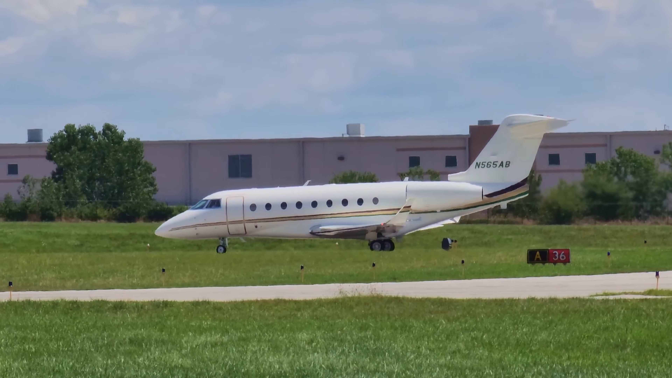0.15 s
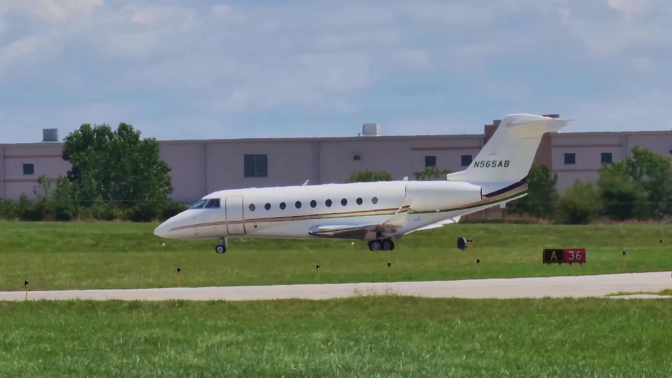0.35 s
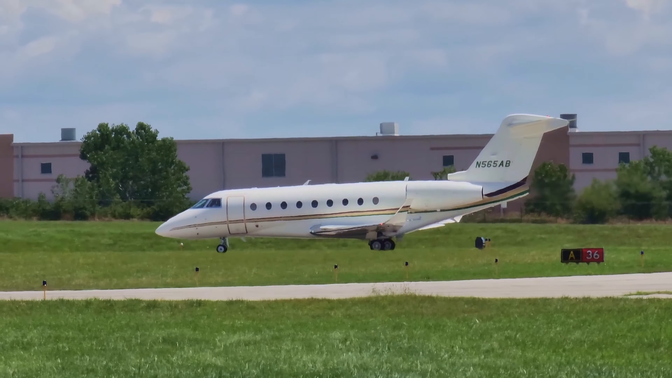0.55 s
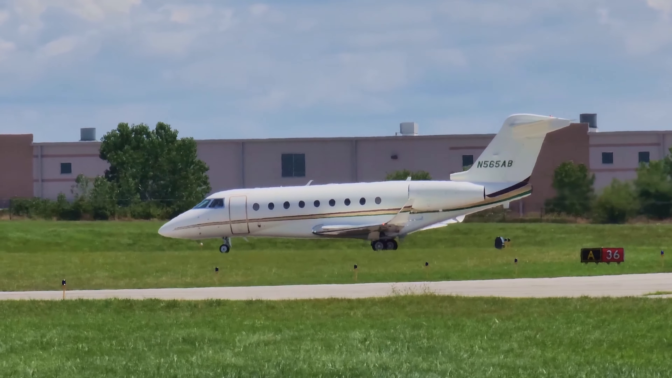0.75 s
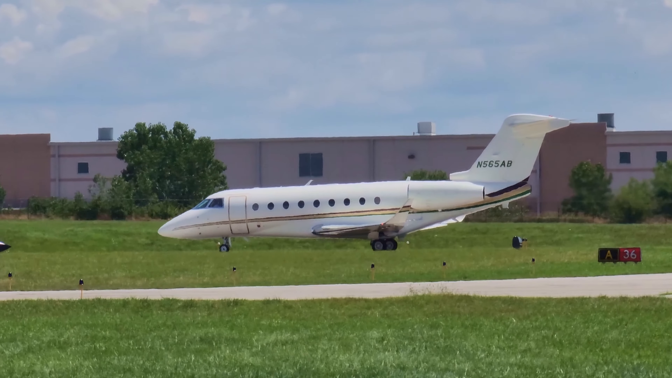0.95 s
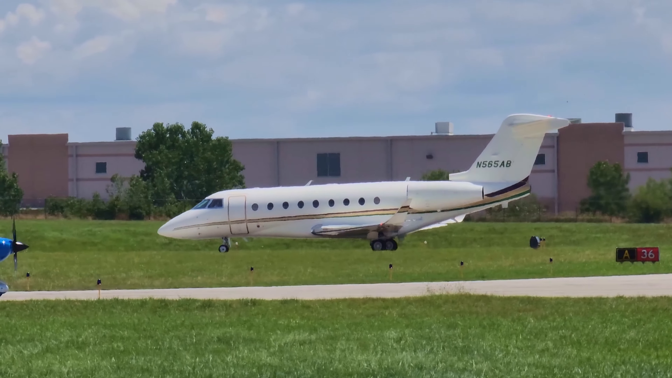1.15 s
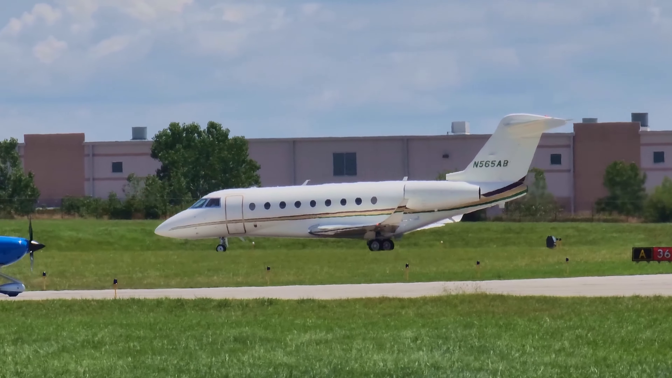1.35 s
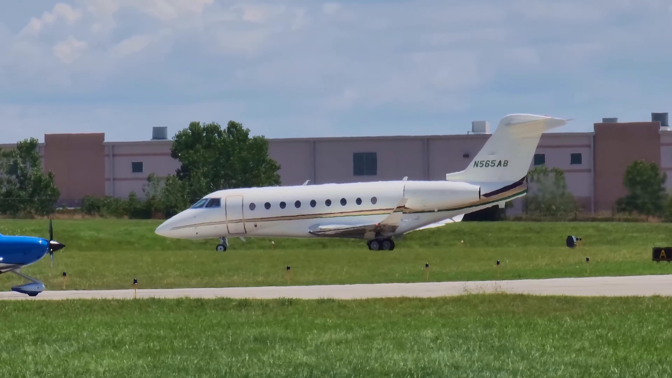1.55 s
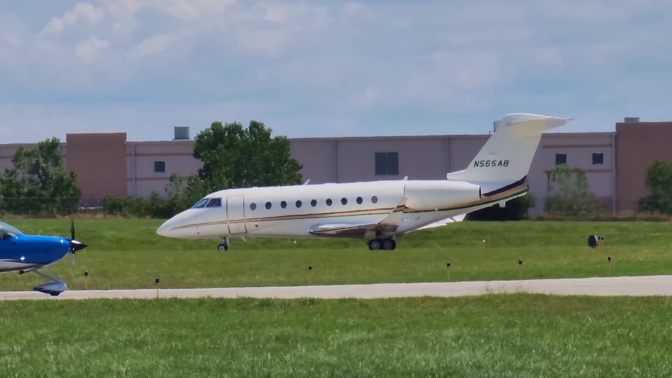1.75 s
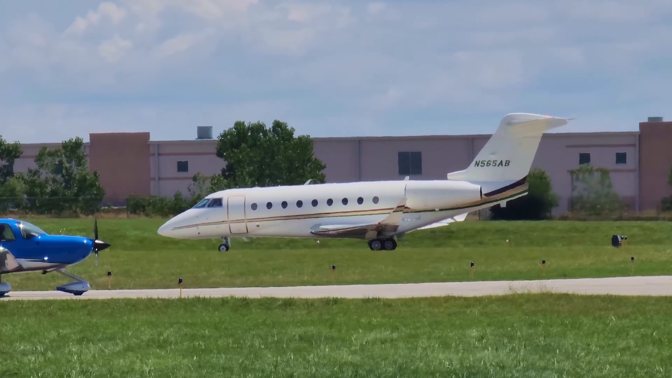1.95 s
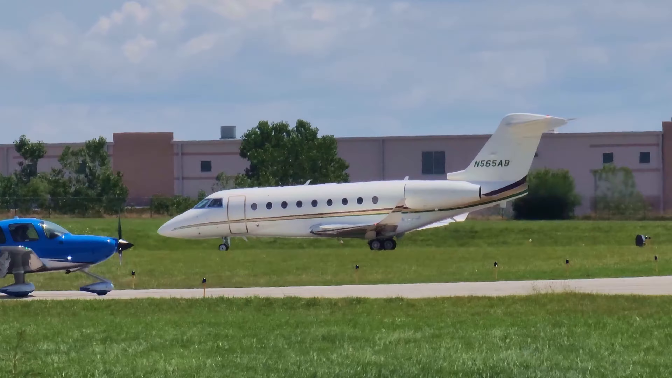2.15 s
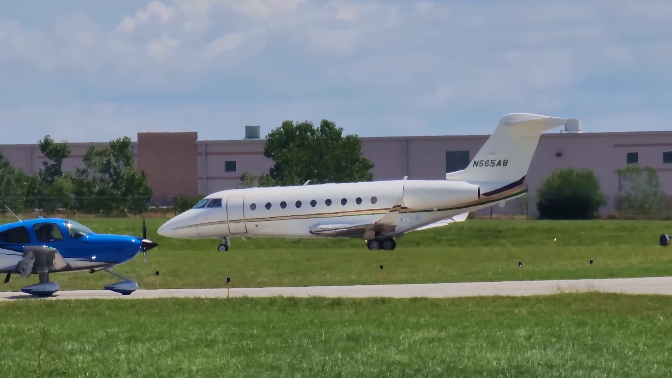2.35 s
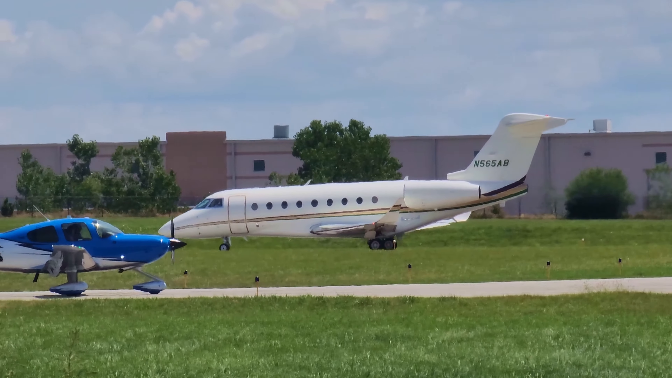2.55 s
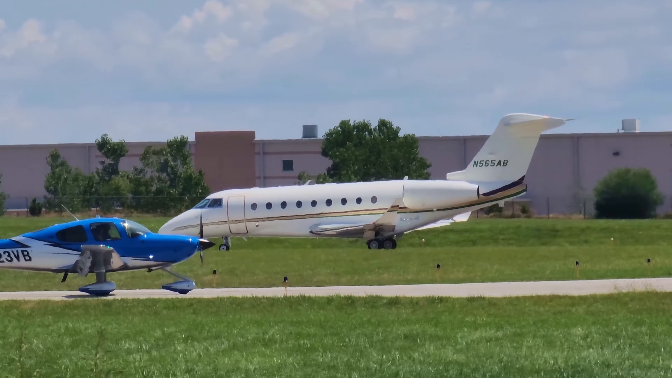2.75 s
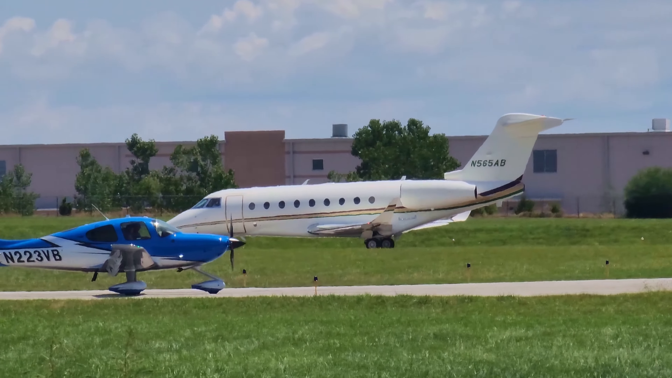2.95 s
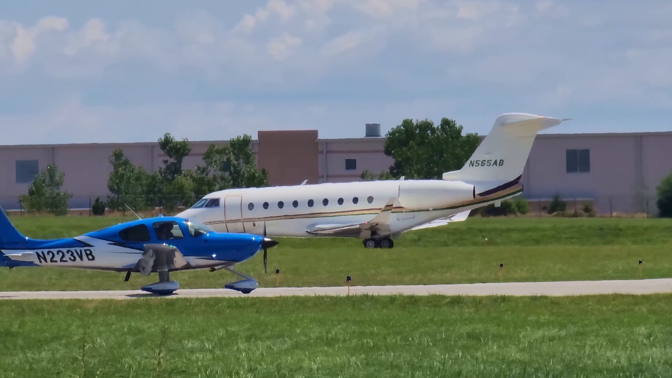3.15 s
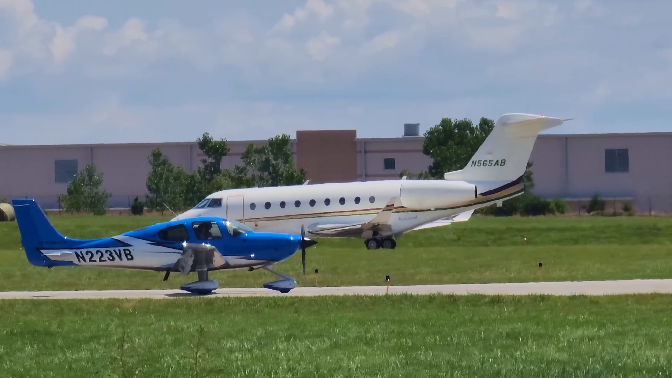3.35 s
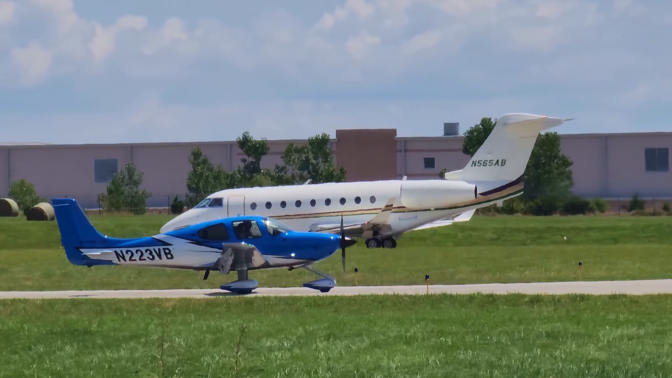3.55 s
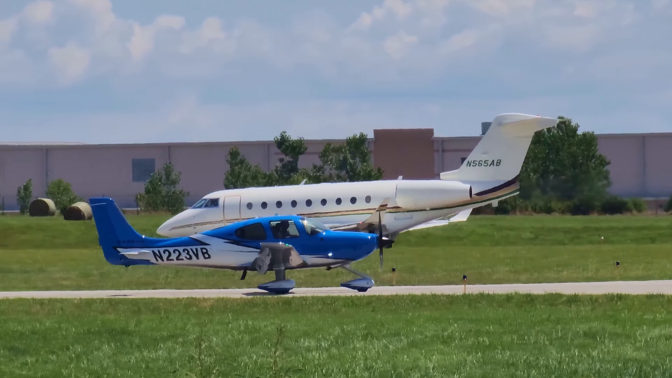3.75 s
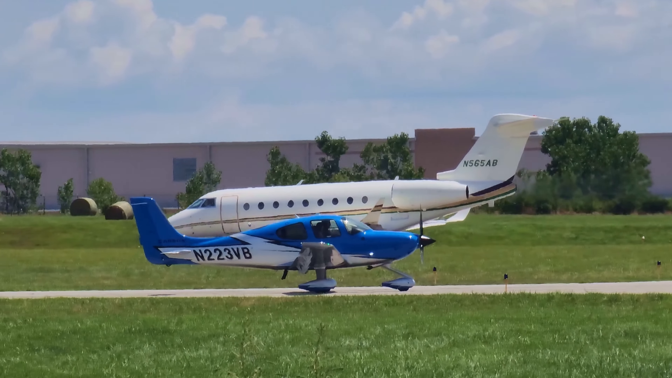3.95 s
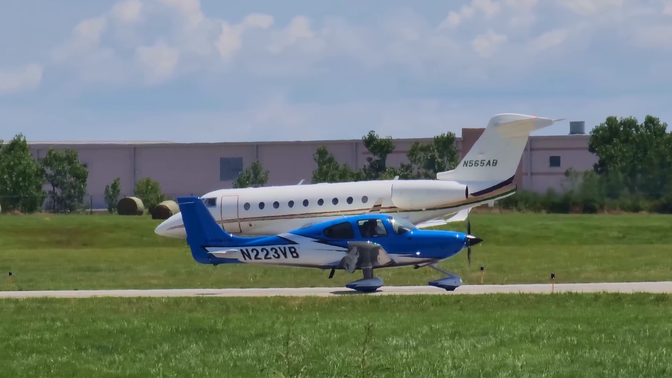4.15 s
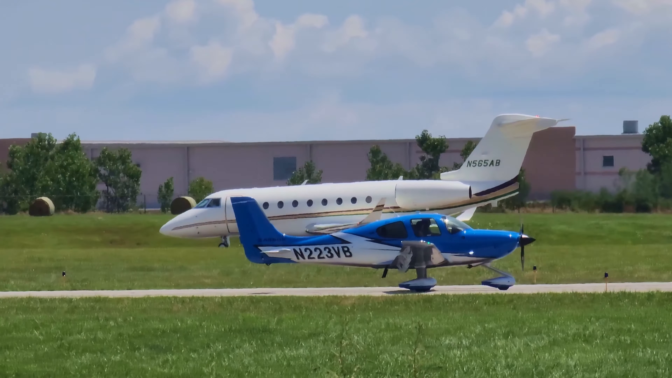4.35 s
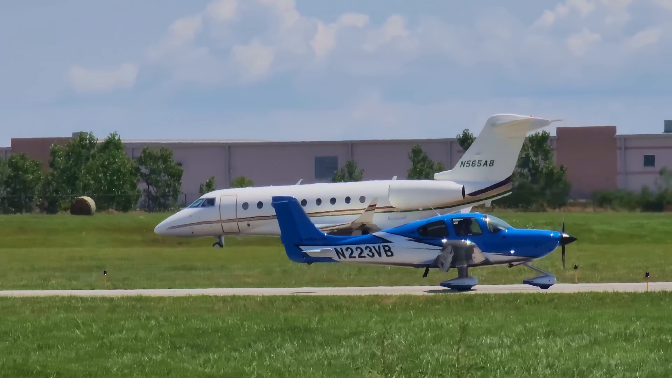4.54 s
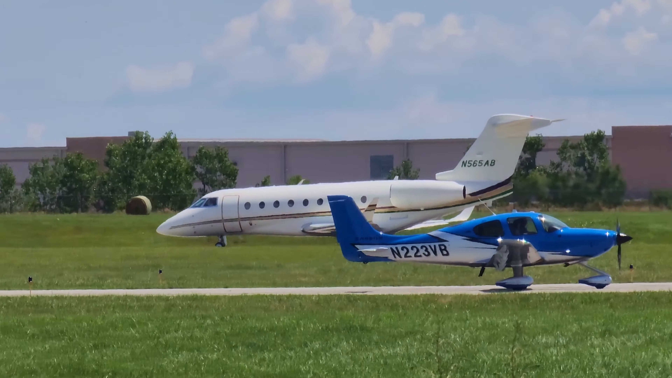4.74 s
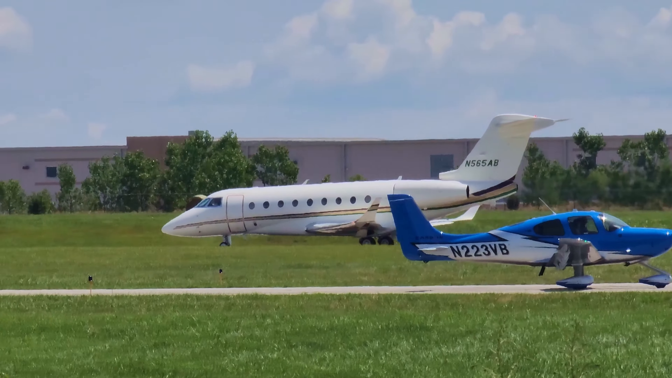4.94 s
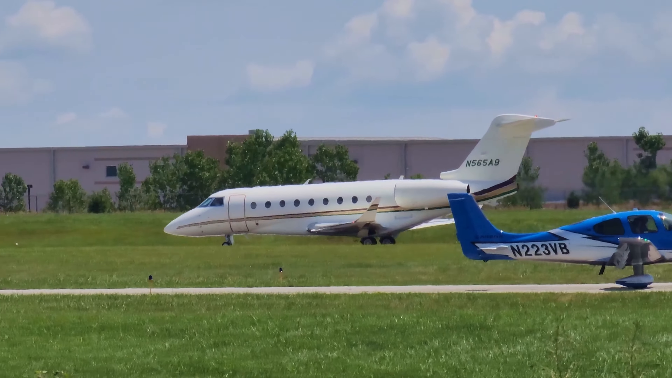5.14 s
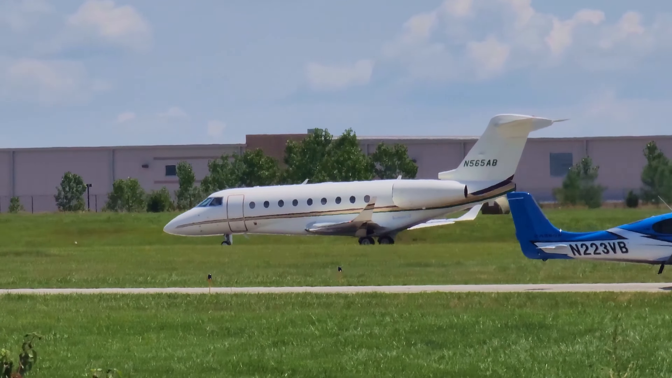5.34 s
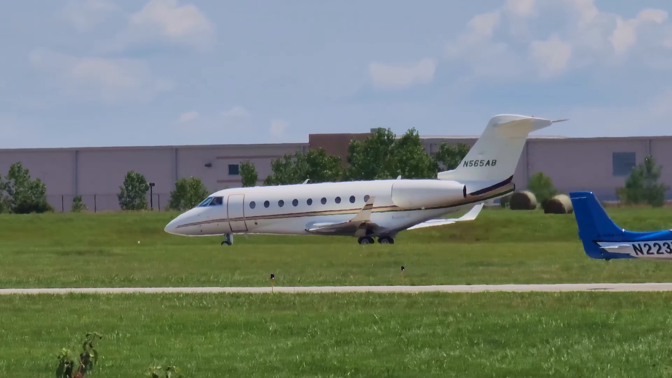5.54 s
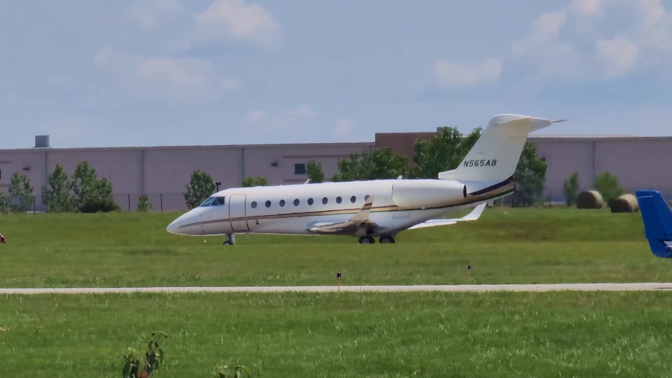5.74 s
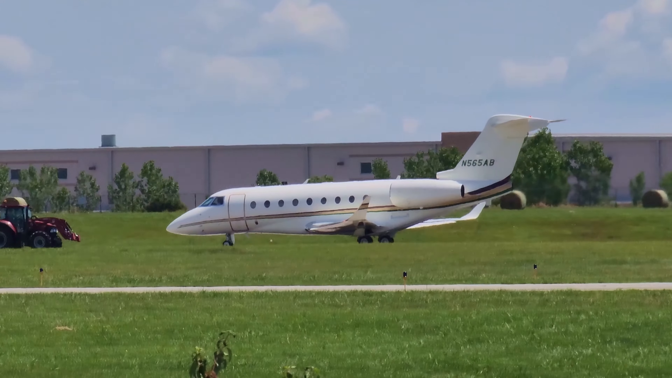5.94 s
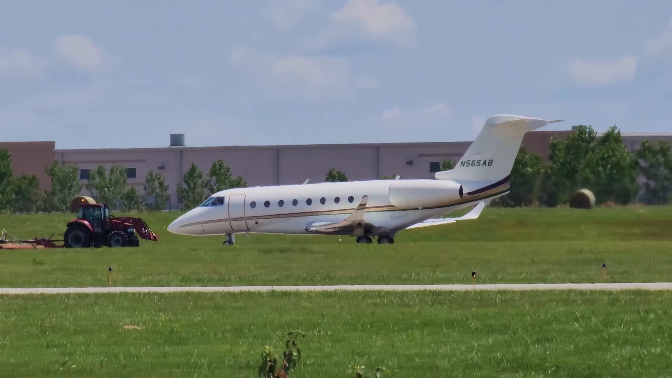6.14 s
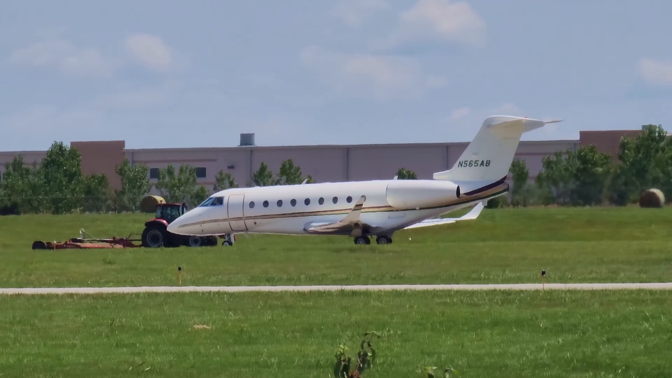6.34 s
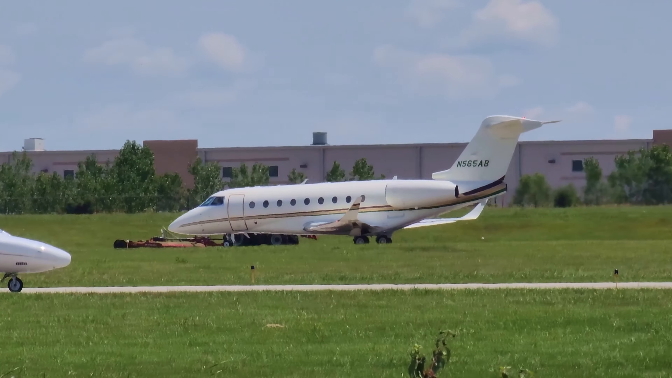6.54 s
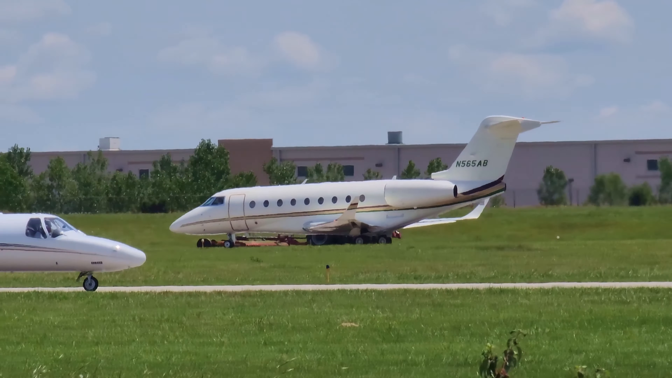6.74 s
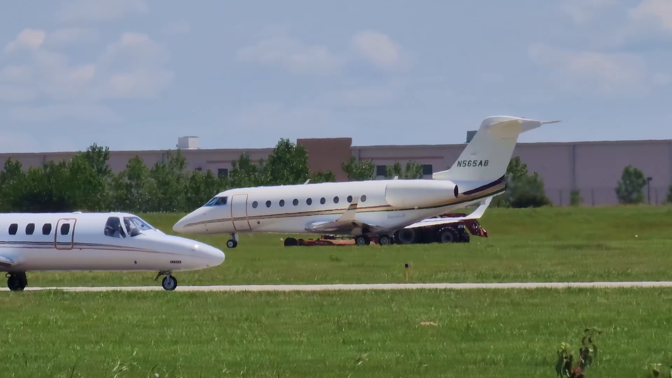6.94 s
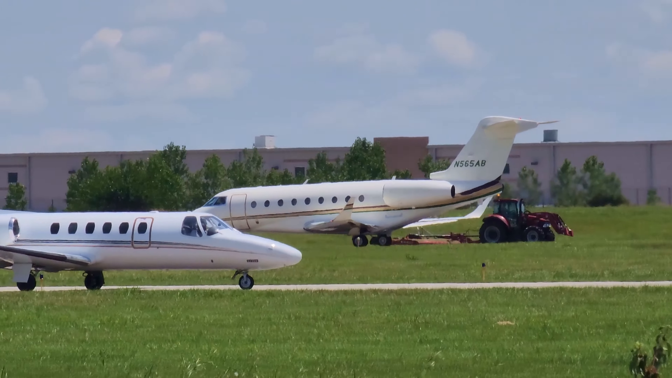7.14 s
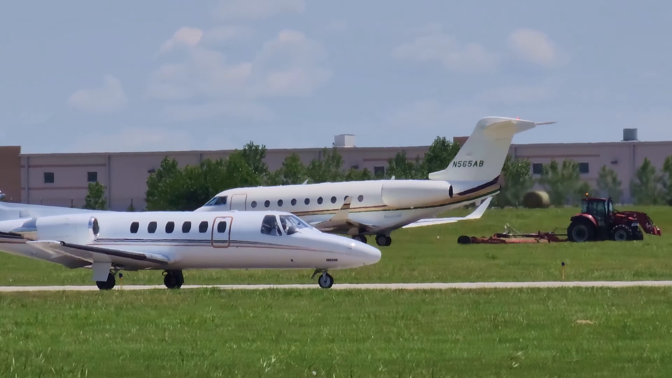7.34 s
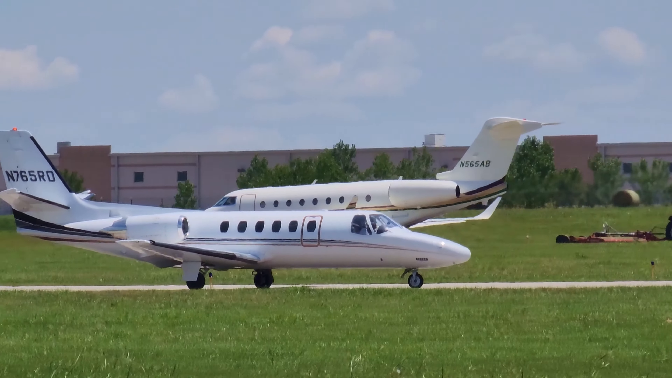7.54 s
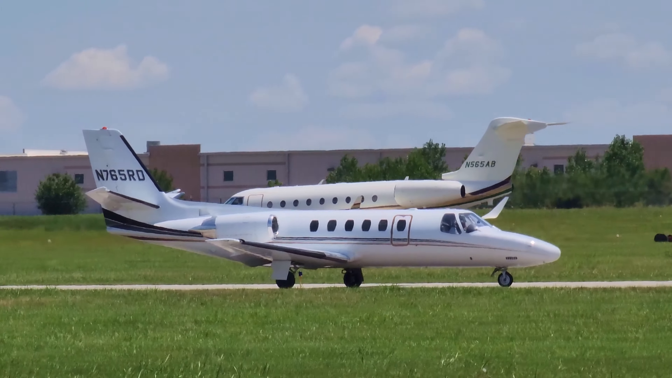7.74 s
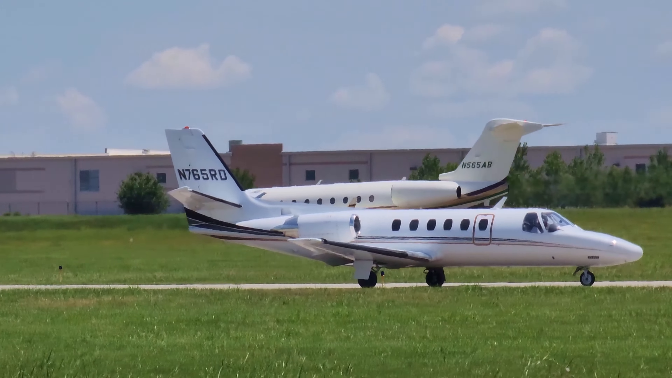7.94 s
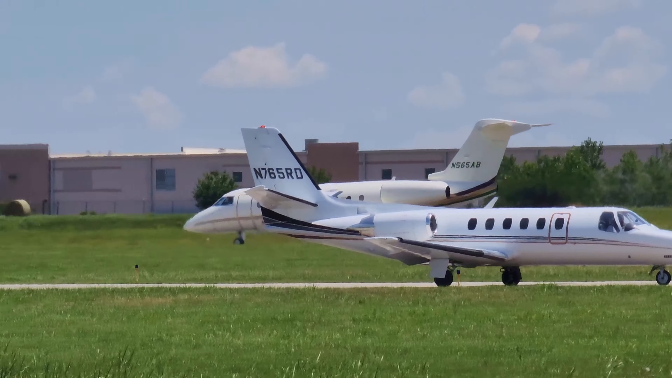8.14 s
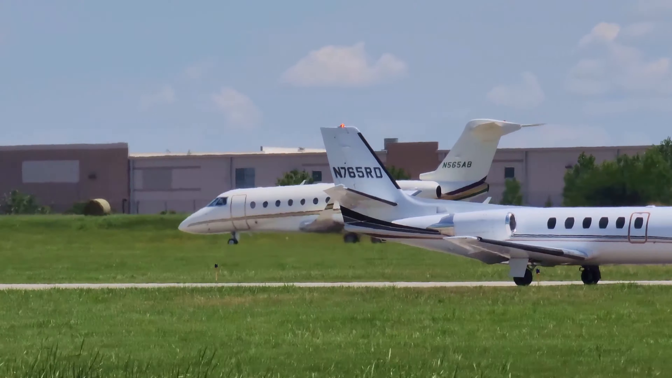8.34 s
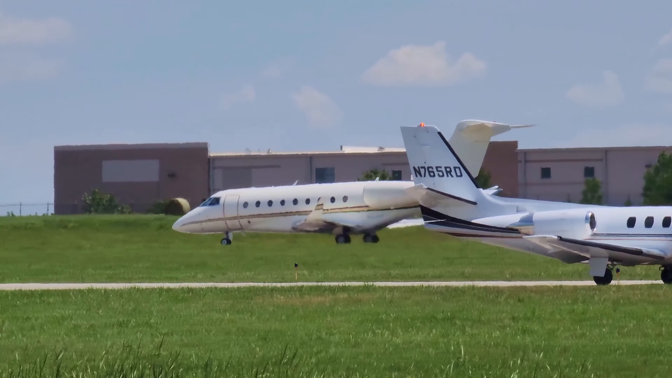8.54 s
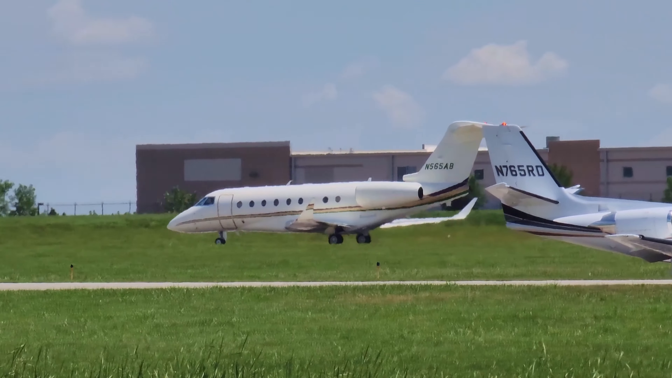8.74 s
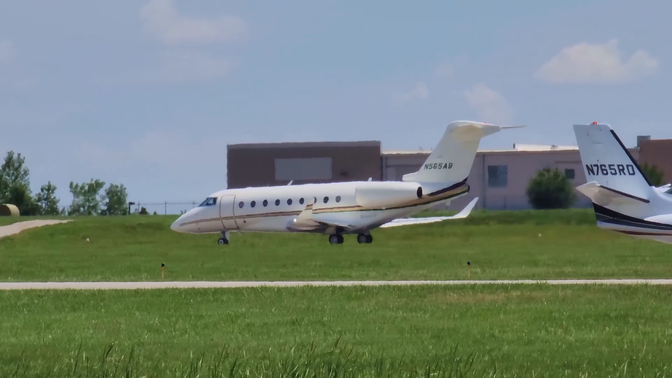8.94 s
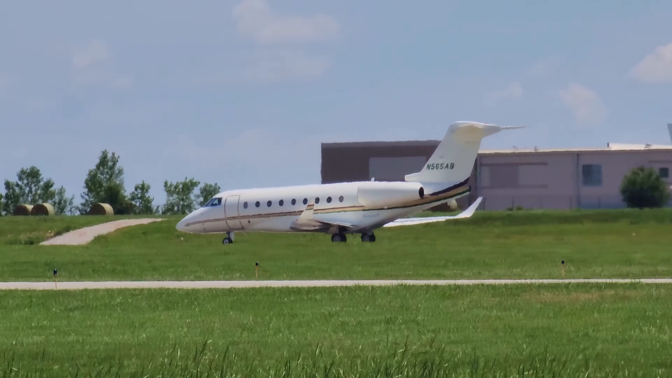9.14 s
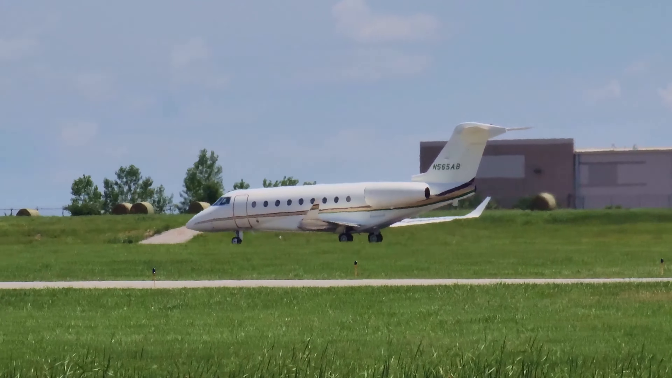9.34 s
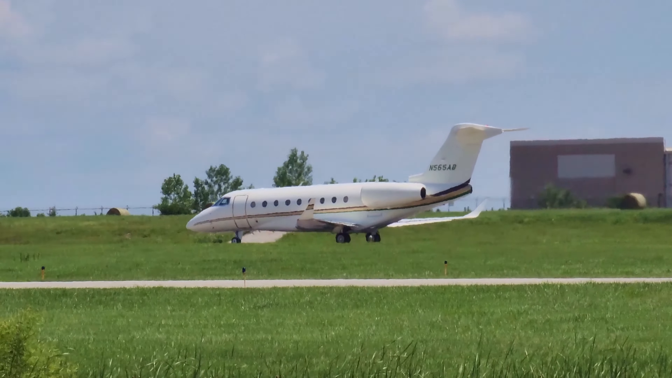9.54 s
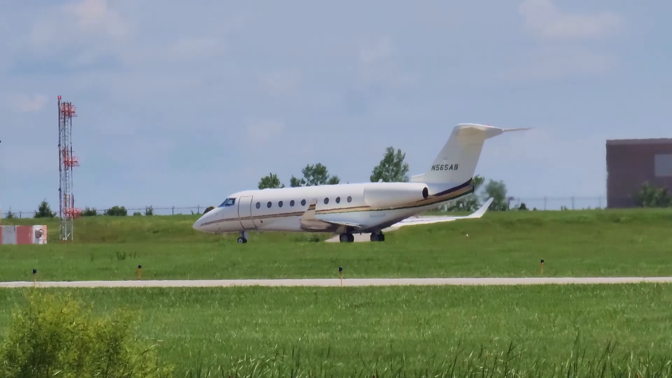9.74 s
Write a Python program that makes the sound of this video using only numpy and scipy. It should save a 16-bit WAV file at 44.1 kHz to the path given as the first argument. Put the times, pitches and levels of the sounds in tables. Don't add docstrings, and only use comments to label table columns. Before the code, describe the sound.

A rising turbine whine over wind buffeting, then jet exhaust builds into a loud rumbling, growling, hissing roar that keeps going.

```python
import sys
import numpy as np
from scipy import signal
from scipy.fft import rfft, irfft, next_fast_len
from scipy.io import wavfile
from scipy.ndimage import uniform_filter1d, minimum_filter1d, map_coordinates

SR = 44100
rng = np.random.default_rng(int(sys.argv[2]) if len(sys.argv) > 2 else 0)


def inscribe(sig):
    pcm = np.round(np.clip(np.atleast_2d(sig).T, -1, 1) * 32767)
    wavfile.write(sys.argv[1], SR, pcm.astype(np.int16))


def ratio_of_db(decibels):
    return 10 ** (np.asarray(decibels, float) / 20)


N = 431732

# (time [s], power [dB])
POWER = [(0, -45), (.5, -47), (1.7, -42), (2.7, -38.5), (2.95, -33.5), (3.6, -28), (4.3, -26), (5.0, -27),
         (5.6, -25), (6.2, -22), (6.45, -23), (6.9, -24), (7.2, -22.5), (7.6, -22), (8.5, -21), (8.92, -21),
         (9.1, -22), (9.79, -20)]
FULL_DB = -28


def exhaust():
    # (frequency [Hz], density [dB per Hz])
    rumble_spectrum = [(12, -38.5), (20, -29), (54, -1), (96, 1.5), (151, -1), (230, -15.5), (300, -45),
                       (510, -120)]
    growl_spectrum = [(120, -56), (200, -3.5), (250, -1.5), (310, -12), (400, -18), (500, -25.5),
                      (620, -45.5), (900, -87)]
    roar_spectrum = [(300, -54.5), (500, -10), (640, -5), (780, -9.5), (870, -8), (1000, -1), (1370, -1.5),
                     (1580, -3), (1800, -5), (2300, -5.5), (3100, -7.5), (3700, -20), (5000, -24.5),
                     (7500, -100)]
    hiss_spectrum = [(2120, -31), (3600, -6), (6430, -11), (6960, -16.5), (8420, -19.5), (9300, -29.5),
                     (12100, -69.5), (20500, -120)]
    # (frequency [Hz], correlation [0-1])
    alike = [(60, 0.98), (250, 1), (600, 0.83), (1500, 0.87), (3000, 0.76), (5000, 0.57), (8000, 0.33)]
    # (middle [s], length [s], change [dB])
    fades = [(0, 0.45, -7), (0.34, 0.24, 4.5), (.64, 0.46, -10.5), (1.286, .3, -5), (2.61, 0.43, -2.5),
             (3.32, 0.08, -3.5), (3.9, 0.46, 3.5), (6.301, 0.69, -4), (6.599, .2, 5.5), (7.9, 1, 2.5)]
    # (middle [s], length [s], change [dB])
    lobes = [
        (.7, 0.55, 3.5),
        (2.1, 1.3, -2),
        (3.15, .5, -4),
        (4.2, 2.5, 3),
        (5.8, 2, -0.5),
        (7.6, 3.8, 8),
        (8.95, .25, 2),
        (9.7, 0.53, -2.5),
    ]
    # (middle [s], length [s], change [dB])
    clearings = [(3.28, .3, 0), (1.87, .2, 2), (4.55, 0.45, 1), (5.0, 0.81, -1.5), (6.17, 0.35, 2),
                 (6.93, 0.058, 5), (7.15, .3, 3.5), (8.2, 0.13, 2), (9.3, 0.55, 3), (9.6, 0.41, -5)]

    (roar_db,), under_db = curves(POWER), below_full()
    fade_db = swells(fades)
    swell_db = 0.35 * wobble(13) + 0.65 * wobble(24)

    roar = unit(filtered(rush(roar_spectrum, alike, patchy_db=1.1), colouring))
    roar = ratio_of_db(roar_db + swell_db) * roar

    hiss_db = -39 + 0.82 * (roar_db - FULL_DB) + 1.1 * swell_db + swells(clearings)
    hiss = ratio_of_db(hiss_db) * rush(hiss_spectrum, alike, patchy_db=2.0)

    shaft = tone(np.full(N, 652.0), 1.5 * roar_db - 9, flutter_db=3.5, drift=0.2, blur=1.1)

    rumble_db = -6.5 + 0.97 * under_db + fade_db
    rumble = ratio_of_db(rumble_db) * rush(rumble_spectrum, alike, patchy_db=0.59)

    growl_db = -28.5 + 0.71 * under_db + 0.14 * fade_db + swells(lobes)
    growl = ratio_of_db(growl_db) * rush(growl_spectrum, alike, patchy_db=1.5)
    return rumble + growl + roar + hiss + shaft


def below_full():
    power_db, = curves(POWER)
    return -2 * np.logaddexp(0, (FULL_DB - power_db) / 2)


def colouring(f):
    # (comb spacing [Hz], level [dB], dull above [Hz])
    echoes = [
        (445.2, -12.5, 6600),
        (353.7, -8.5, 1100),
        (195.1, -2.5, 520),
    ]
    # (frequency [Hz], width [Hz], depth [0-1])
    notches = [
        (1135, 150, .75),
        (1565, 100, .4),
        (2860, 200, .4),
    ]
    response = 1
    for step_hz, db, dull_hz in echoes:
        response = response + ratio_of_db(db) * np.exp(-2j * np.pi * f / step_hz) / (1 + (f / dull_hz) ** 2)
    for hz, width_hz, depth in notches:
        damping = 1j * f * width_hz
        response = response * (1 - depth * damping / (hz * hz - f * f + damping))
    return response


def panned(x):
    # (time [s], lag of the left port [samples])
    lags = [(0, -4), (2.4, -4), (2.65, .5), (5, 1.3), (9.79, 1.8)]
    lag, = curves(lags)
    ports = [map_coordinates(port, [np.arange(N) - way * lag / 2], order=3, mode="nearest")
             for port, way in zip(x, (1, -1))]
    return np.array(ports)


def blades():
    # (time [s], frequency [Hz])
    core = [(0, 3000), (.51, 3360), (1.05, 3760), (1.4, 4010), (1.62, 4210), (1.82, 4470), (2.17, 5050),
            (2.43, 5550), (3.07, 6910), (3.3, 7410), (3.45, 7640), (3.7, 7672), (6.5, 7672), (9.79, 7485)]
    fan = [(2.35, 2150), (2.48, 2220), (2.97, 2620), (3.41, 3010), (3.63, 3120), (3.88, 3220), (4.14, 3280),
           (4.5, 3300)]
    # (time [s], frequency [Hz])
    taxi = [(1.1, 1785), (1.36, 1800), (1.67, 1805), (1.7, 2030), (2.36, 2070)]
    # (from [s], to [s], level [dB])
    core_heard = [
        [(0, 1.05, -58), (1.06, 3.1, -68), (0, .14, -56), (.6, 1.05, -56), (.88, 1.04, -64), (1.79, 1.89, -49),
         (1.89, 2.11, -62), (2.05, 2.11, -56), (2.6, 3.05, -65)],
        [(.1, 3.4, -66), (.8, 1.35, -62), (2.1, 2.18, -56), (2.28, 2.46, -55), (2.58, 2.66, -58),
         (3.0, 3.3, -66), (5.6, 7.2, -65), (7.2, 9.1, -70), (9.1, 9.9, -62)],
        [(.75, 2.25, -69), (.88, 1.3, -64), (1.52, 1.75, -60)],
    ]
    fan_heard = [
        [(2.4, 4.5, -58), (2.44, 2.54, -51), (2.72, 2.97, -49), (3.41, 3.66, -42), (3.41, 3.78, -43),
         (3.78, 3.92, -47), (4.15, 4.36, -48)],
        [(3.3, 4.1, -66), (3.42, 3.62, -61), (3.8, 4.03, -58)],
    ]
    taxi_heard = [
        [(1.1, 1.64, -57), (1.15, 1.21, -54), (1.34, 1.54, -43.5), (1.54, 1.63, -51), (1.73, 2.36, -57),
         (1.74, 1.91, -51), (2.24, 2.34, -53)],
    ]

    late_s = np.arange(N) / SR - 3.3
    slope_db = np.minimum(3 * late_s, -28 * late_s)
    rush_db = -40 + slope_db.clip(-22, 0)
    wide = unit(filtered(rng.standard_normal((2, N)), lambda f: 1 / (1 + (f / 1700) ** 4)))
    centre_hz = np.minimum(1.1 * curves(core)[0], 6690)
    carrier = np.sin(2 * np.pi * np.cumsum(centre_hz) / SR)
    blade_rush = np.sqrt(2) * ratio_of_db(rush_db) * wide * carrier

    core_tones = spool(core, (1, 1.108, 1.322), core_heard)
    fan_tones = spool(fan, (1, 2), fan_heard)
    return blade_rush + core_tones + fan_tones + spool(taxi, (1, 2), taxi_heard)


def spool(speed, multiples, heard):
    come_s, go_s = 0.012, 0.03
    t = np.arange(N) / SR
    hz = uniform_filter1d(curves(speed)[0], size=1500, mode="nearest")
    out = 0
    for multiple, spans in zip(multiples, heard):
        level = 0
        for start, end, db in spans:
            gate = np.minimum((t - start) / come_s + 1, (end - t) / go_s + 1).clip(0, 1)
            level = level + ratio_of_db(db) * gate
        out = out + level * tone(multiple * hz, 3.5, flutter_db=2.4, drift=0.25, blur=0.8)
    return out


def tone(hz, db, flutter_db, drift, blur=0.25):
    phase = 2 * np.pi * np.cumsum(hz) / SR + blur * wobble(45)
    phase = phase + drift * wobble(14) * [[1], [-1]]
    return np.sqrt(2) * ratio_of_db(db + flutter_db * wobble(38)) * np.sin(phase)


def wind():
    # (frequency [Hz], density [dB per Hz])
    buffet_spectrum = [(12, -37), (20, -19), (48, 8.5), (124, 2.5), (172, -20), (270, -11.5), (485, -44),
                       (600, -33.5), (780, -60.5), (1320, -120)]
    # (middle [s], length [s], level [dB], left minus right [dB])
    gusts = [(.27, 1, -29, -16), (.64, 0.18, -33, -3.5), (.86, 0.2, -36.5, -10), (1.03, .1, -40, 22),
             (1.2, 0.5, -21, -32), (1.75, .5, -23, 25), (2.25, 0.35, -26, 10), (2.7, 0.89, -24.5, -24),
             (5.4, 1, -22, -12), (6.4, .7, -20.5, 5.5), (7.5, 0.7, -17, 7.5), (8.2, .6, -25, -4),
             (9.12, .25, -22, -4.5), (9.65, 0.78, -27.5, -1)]
    # (time [s], level [dB], left minus right [dB], frequency [Hz])
    pops = [
        (0.384, -15, 9, 170),
        (1.03, -23, 5, 90),
        (1.179, -17, -15, 140),
        (2.251, -21, 4, 70),
        (2.365, -19, -2, 170),
        (2.567, -12, -13, 120),
        (2.75, -21, -8, 130),
    ]

    level = ratio_of_db(-26 + 0.91 * below_full() + 1.7 * wobble(5))
    for s, length, db, pan_db in gusts:
        louder_port_is_1 = sides(pan_db)[:, None] / ratio_of_db(abs(pan_db) / 2)
        level = level + ratio_of_db(db) * louder_port_is_1 * bump(s, length)
    lumps = ratio_of_db(2.5 * np.array([wobble(29), wobble(42)]))
    out = level * unit(lumps * rush(buffet_spectrum, [(30, 0.01)], patchy_db=1.0))

    t = np.arange(1800) / SR - 0.012
    for s, db, pan_db, hz in pops:
        push = np.exp(-(t * hz / 0.48) ** 2) * np.cos(2 * np.pi * hz * t)
        start = round((s - 0.011) * SR)
        out[:, start:][:, :len(t)] += ratio_of_db(db) * sides(pan_db)[:, None] * [[1], [-1]] * push
    return out


def bird():
    # (time [s], peak level [dB])
    trill = [(2.086, -36), (2.1311, -39), (2.1556, -37), (2.183, -33), (2.211, -34), (2.2365, -33),
             (2.2658, -36), (2.2958, -43), (2.3277, -42), (2.3636, -34), (2.395, -43), (2.4255, -38),
             (2.4594, -33), (2.494, -30), (2.5332, -36), (2.5637, -35), (2.5996, -34), (2.6325, -35)]
    out, t = np.zeros(N + SR), np.arange(1400) / SR
    for s, db in trill:
        lift_hz = 200 * np.exp((trill[0][0] - s) / 0.11)
        hz = 3080 + lift_hz + 15 * rng.standard_normal()
        envelope = np.sin(np.pi * (t / 0.027).clip(0, 1)).clip(0) ** 0.7
        note = envelope * np.sin(2 * np.pi * hz * t * (1 - 0.27 * t))
        out[round((s - 0.003) * SR):][:len(t)] += ratio_of_db(db + 0.5) * note
    return np.array([out[8:N + 8], out[:N]]) * sides(-6.5)[:, None]


def howls():
    # (frequency [Hz], width [Hz], middle [s], length [s], level [dB])
    bands = [
        (1360, 55, 1.2, 2.0, -47),
        (2030, 60, 1.5, 3.4, -52),
        (2250, 60, 1.7, 3.6, -53),
    ]
    out = 0
    for hz, width_hz, s, length, db in bands:
        noise = rng.standard_normal(N)
        band = unit(filtered(noise, lambda f: 1 / (1 + ((f - hz) / width_hz) ** 2)))
        out = out + ratio_of_db(db) * np.sqrt(bump(s, length)) * band
    return out


def apron():
    # (frequency [Hz], level [dB], left minus right [dB])
    parked = [(2005, -59, .5), (3368, -57, -8), (4278, -60, .5), (6738, -69, -3), (8555, -71, .5),
              (10745, -82, .5)]
    # (frequency [Hz], density [dB per Hz])
    ambient_spectrum = [(180, -29), (300, -16.5), (525, -26.5), (933, -23.5), (1140, -23), (1260, -9.5),
                        (2210, -8), (3930, -22.5), (5540, -8.5), (8410, -18.5), (9300, -47.5),
                        (12100, -89.5), (20500, -120)]
    tones = 0
    for hz, db, pan_db in parked:
        tones = tones + sides(pan_db)[:, None] * tone(np.full(N, hz), db, flutter_db=2.5, drift=0.5)
    alike = [(300, 0.29), (2000, 0.22), (5000, 0.01)]  # (Hz, likeness of the ports)
    diffuse = rush(ambient_spectrum, alike, patchy_db=2.0)
    return tones + ratio_of_db(-45.0) * filtered(diffuse, colouring)


def rush(spectrum, alike, patchy_db):
    z = signal.stft(rng.standard_normal((2, N)), nperseg=512)[2]

    def patches(bins, frames):
        field = uniform_filter1d(rng.standard_normal(z.shape[1:]), size=bins, axis=0)
        return unit(uniform_filter1d(field, size=frames, axis=1))

    field = patches(7, 16) + 0.89 * patches(3, 70)
    pair = signal.istft(z * ratio_of_db(patchy_db * field), nperseg=512)[1][:, :N]

    def mid_side(hz):
        turn = np.arccos(np.clip(along(alike, hz), -1, 1)) / 2
        return ratio_of_db(along(spectrum, hz)) * [np.cos(turn), np.sin(turn)]

    mid, side = filtered(pair, mid_side)
    return unit(np.array([mid + side, mid - side]))


def unit(x):
    return x / np.sqrt(np.mean(x ** 2) + 1e-20)


def along(points, hz):
    f, v = np.transpose(points)
    return np.interp(np.log(hz + 1), np.log(f + 1), v)


def curves(rows):
    s, *cols = np.transpose(rows)
    return [np.interp(np.arange(N) / SR, s, c) for c in cols]


def wobble(rate):
    coarse = np.arange(0, N + 32, 32)
    knots = rng.standard_normal(1000)
    return np.interp(np.arange(N), coarse, map_coordinates(knots, [coarse * rate / SR], order=2))


def bump(s, length):
    u = np.arange(N) * (2 / SR / length) - 2 * s / length
    return (1 - u * u).clip(0, 1) ** 2


def swells(rows):
    return sum(db * bump(s, length) for s, length, db in rows)


def filtered(x, response):
    m = next_fast_len(N + 8192)
    return irfft(rfft(x, m) * response(np.fft.rfftfreq(m, 1 / SR)), m)[..., :N]


def sides(db):
    return ratio_of_db(np.array([db / 2, -db / 2]))


def scene():
    far = panned(exhaust()) + blades()
    near = apron() + bird() + wind() + howls() * sides(-1)[:, None]
    return far + near


def low_pass(x):
    return signal.sosfilt(signal.butter(12, 15740, fs=SR, output="sos"), x)


def record(dry):
    # (frequency [Hz], left minus right [dB])
    balance = [(100, -0.4), (400, 0), (1000, -1.4), (3000, -0.5), (6000, -1.5), (9000, -2.5)]
    # (frequency [Hz], density [dB per Hz])
    self_noise = [(6000, -39.5), (9000, -5.5), (10800, 6), (11500, -9.5), (12500, -10), (14600, -7),
                  (15600, 0), (16200, -59.5)]
    x = filtered(dry, lambda hz: sides(along(balance, hz)))
    x = x + ratio_of_db(-73) * rush(self_noise, [(9000, 0.3)], patchy_db=2.5)
    x = x * (1 - bump(N / SR, 0.004))

    bass = filtered(x, lambda hz: 1 / (1 + (hz / 400) ** 4))
    need = np.minimum(1, 1.0 / (np.abs(x).max(axis=0) + 1e-9))
    duck = uniform_filter1d(minimum_filter1d(need, size=700), size=700)
    x = bass * duck + (x - bass) * duck ** 0.35
    x = x / (1 + np.abs(x / 1.06) ** 12) ** (1 / 12)
    return low_pass(x)


dry = scene()
out = record(dry)
inscribe(out)
```